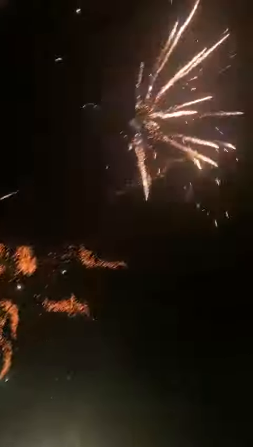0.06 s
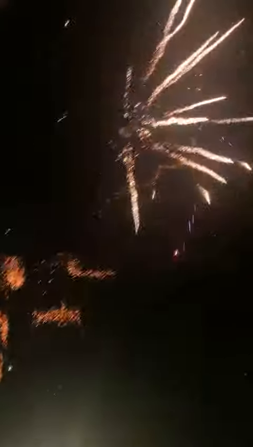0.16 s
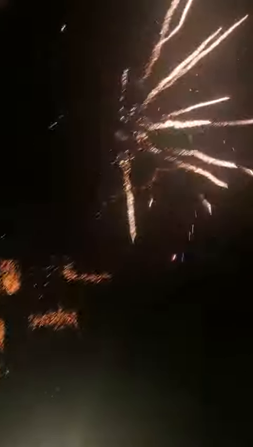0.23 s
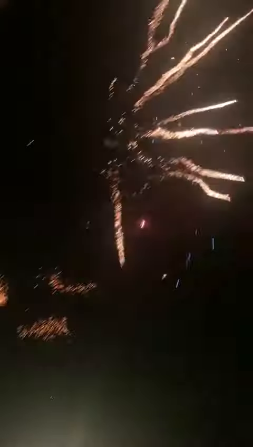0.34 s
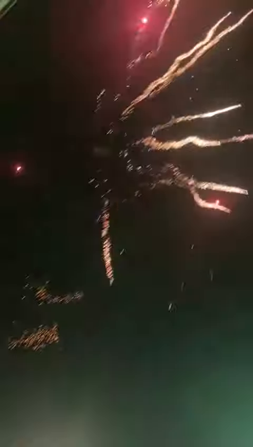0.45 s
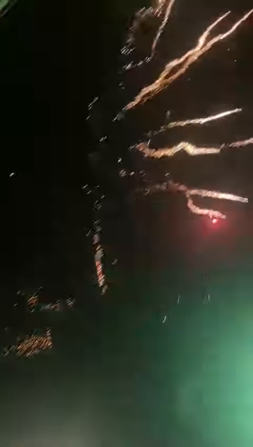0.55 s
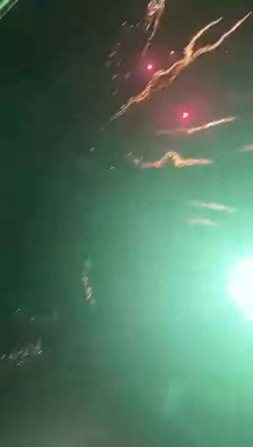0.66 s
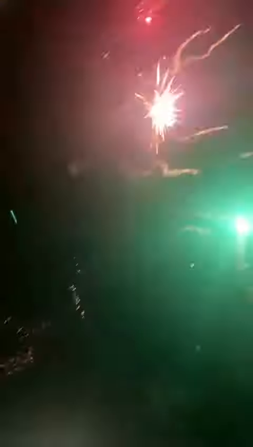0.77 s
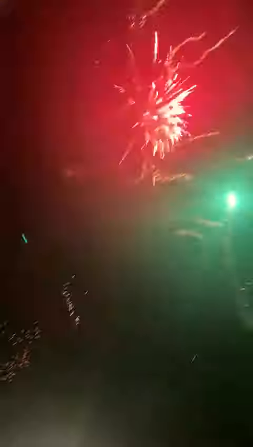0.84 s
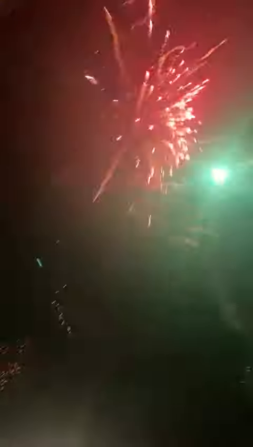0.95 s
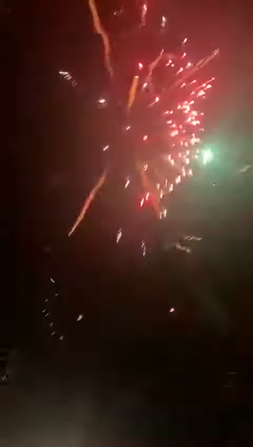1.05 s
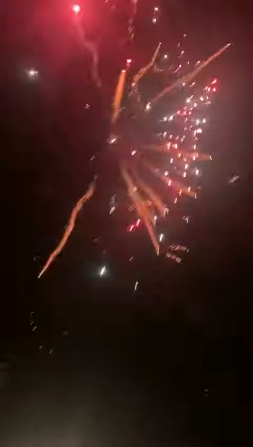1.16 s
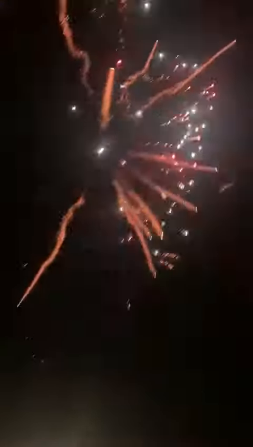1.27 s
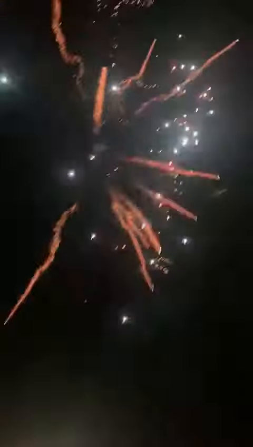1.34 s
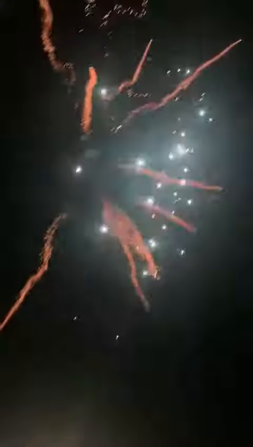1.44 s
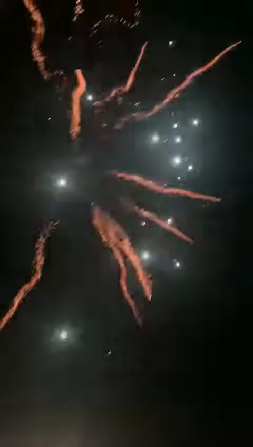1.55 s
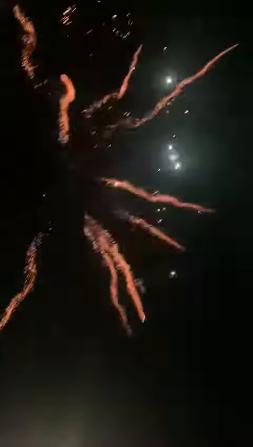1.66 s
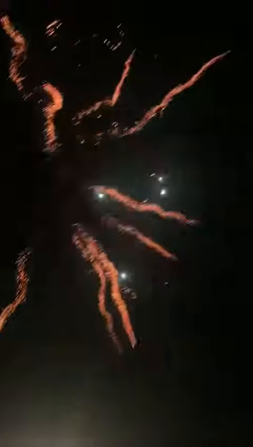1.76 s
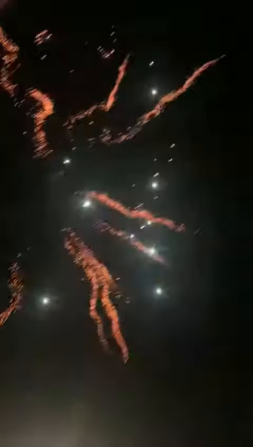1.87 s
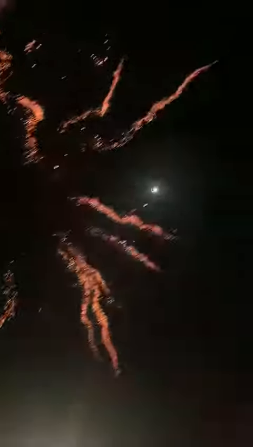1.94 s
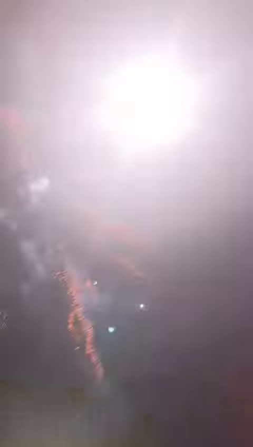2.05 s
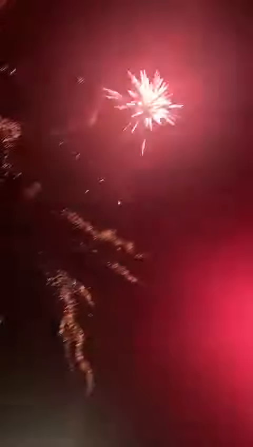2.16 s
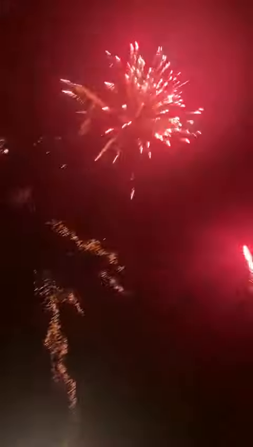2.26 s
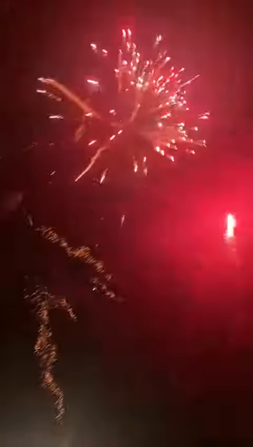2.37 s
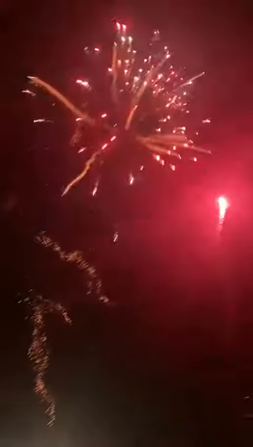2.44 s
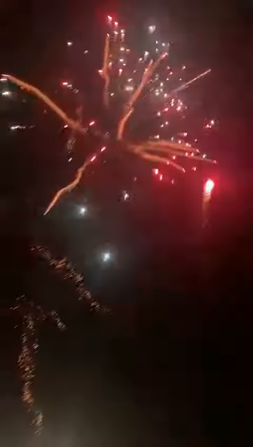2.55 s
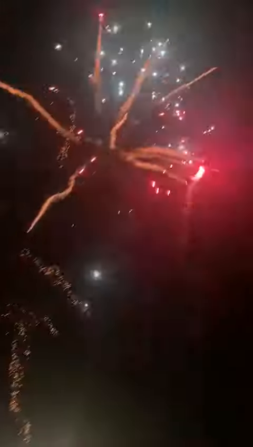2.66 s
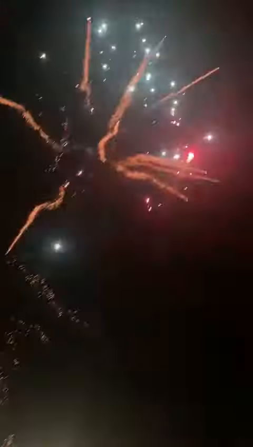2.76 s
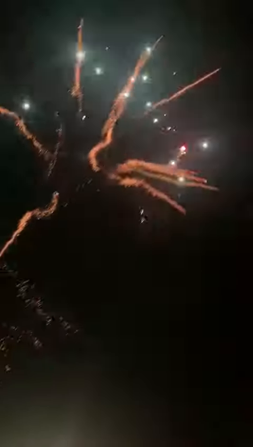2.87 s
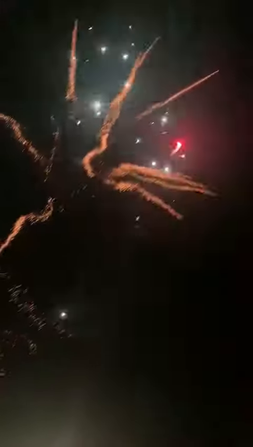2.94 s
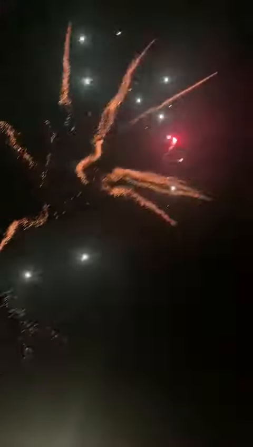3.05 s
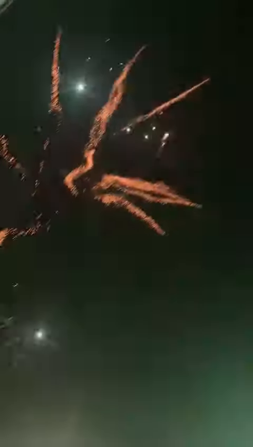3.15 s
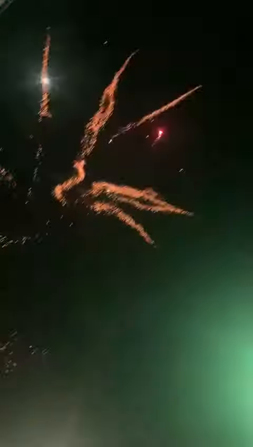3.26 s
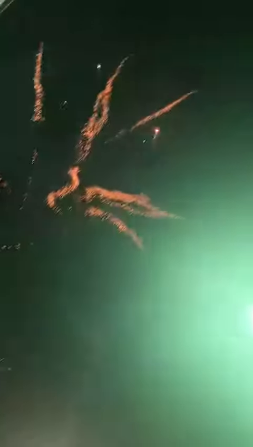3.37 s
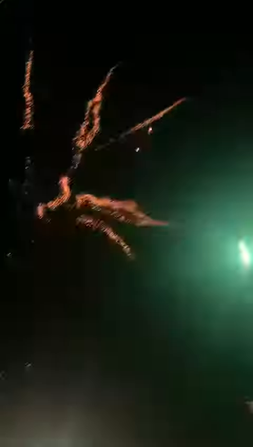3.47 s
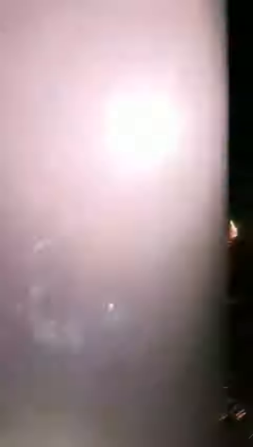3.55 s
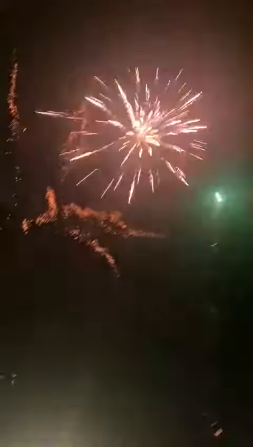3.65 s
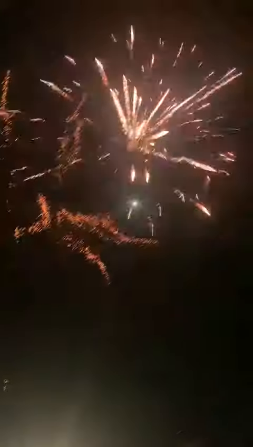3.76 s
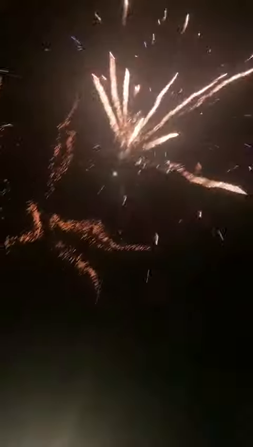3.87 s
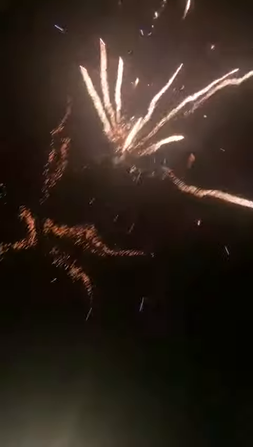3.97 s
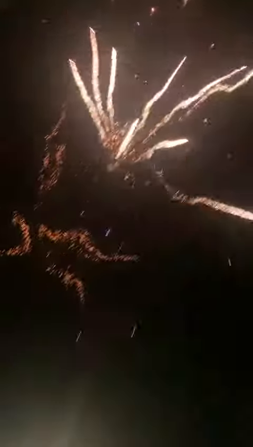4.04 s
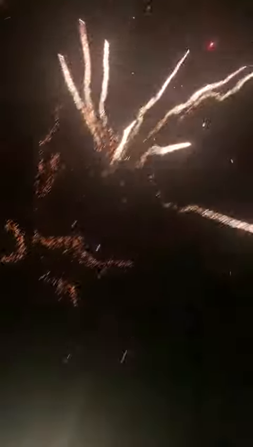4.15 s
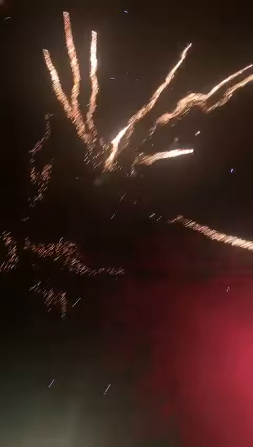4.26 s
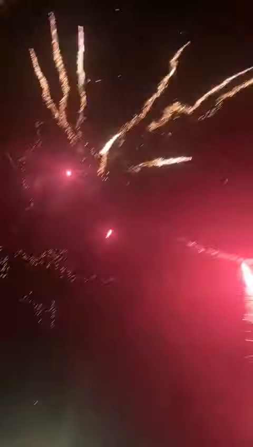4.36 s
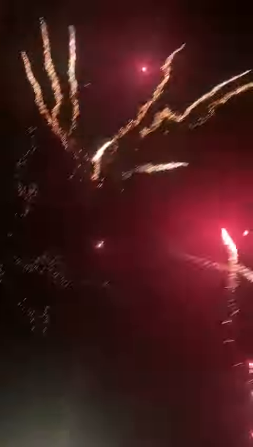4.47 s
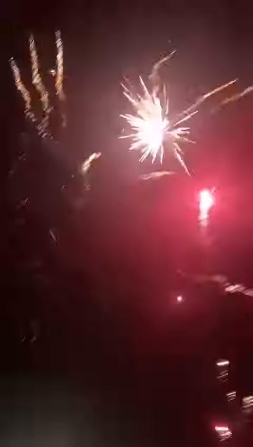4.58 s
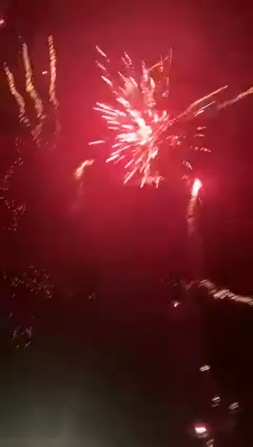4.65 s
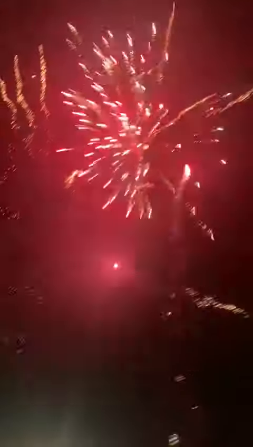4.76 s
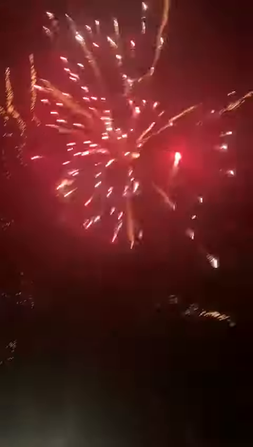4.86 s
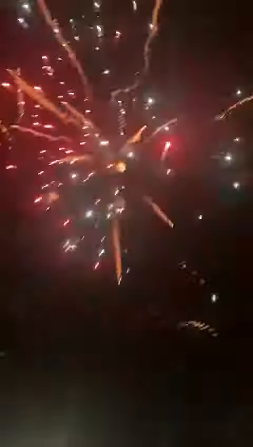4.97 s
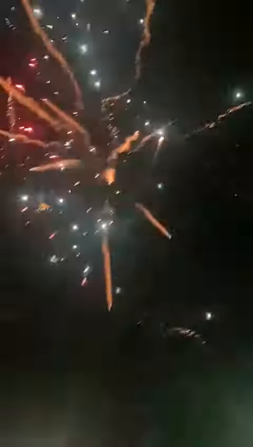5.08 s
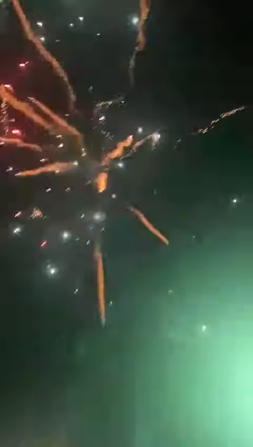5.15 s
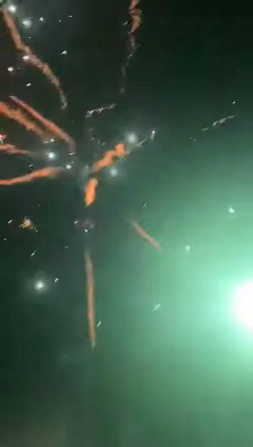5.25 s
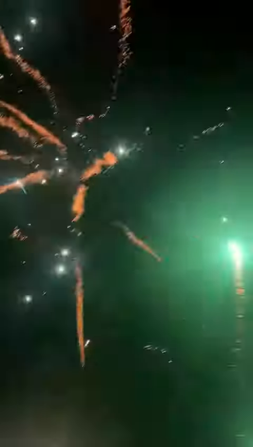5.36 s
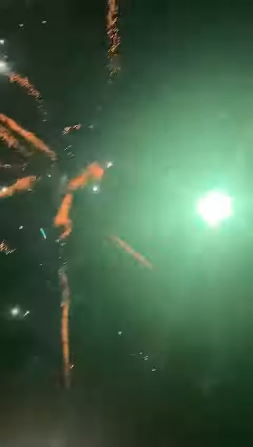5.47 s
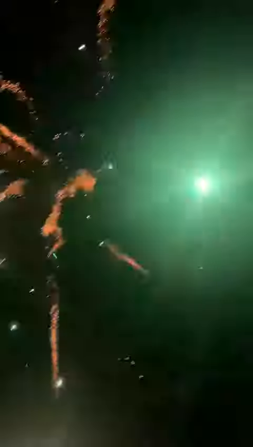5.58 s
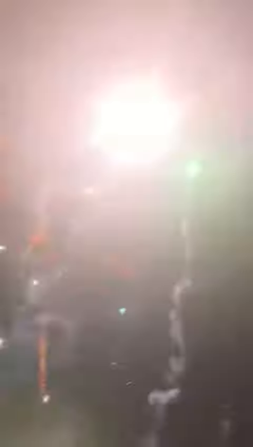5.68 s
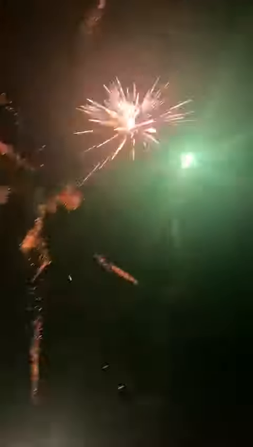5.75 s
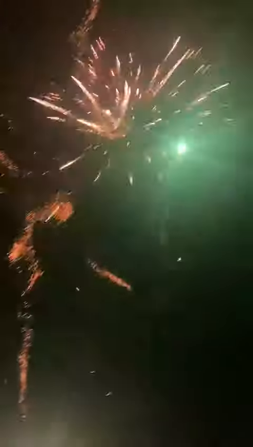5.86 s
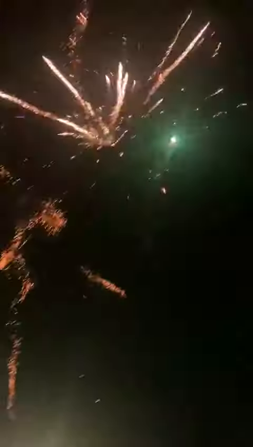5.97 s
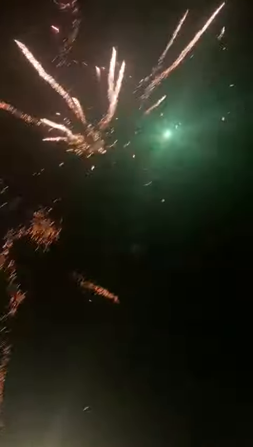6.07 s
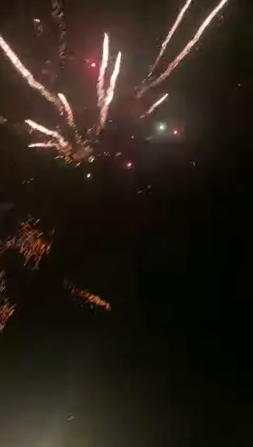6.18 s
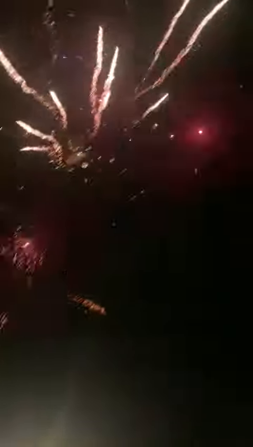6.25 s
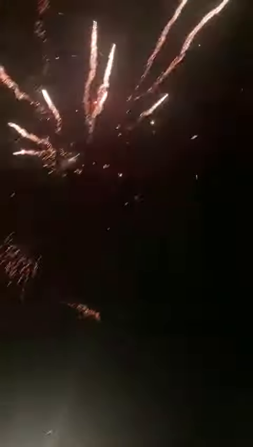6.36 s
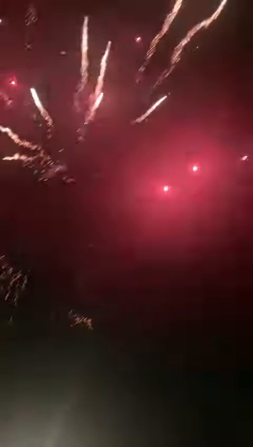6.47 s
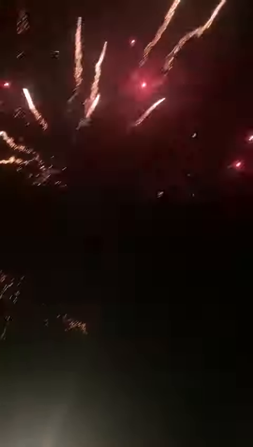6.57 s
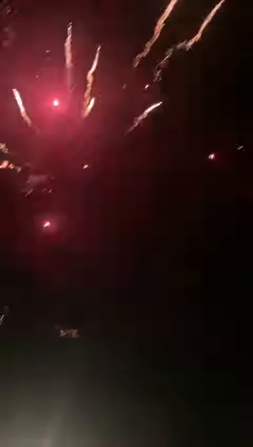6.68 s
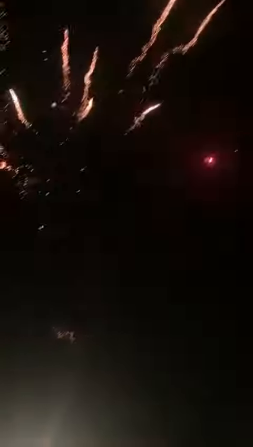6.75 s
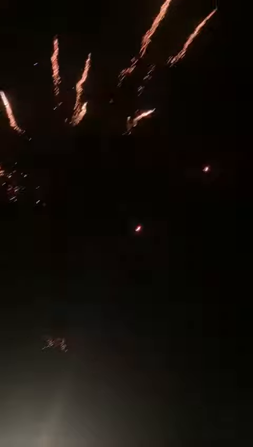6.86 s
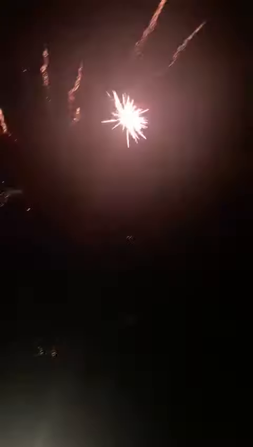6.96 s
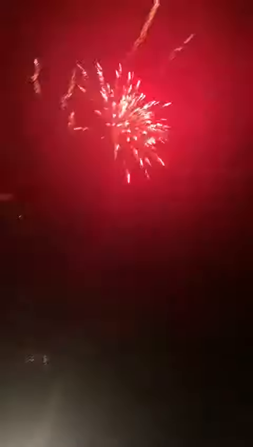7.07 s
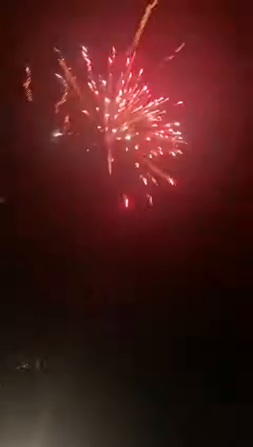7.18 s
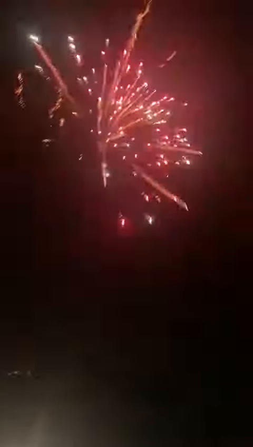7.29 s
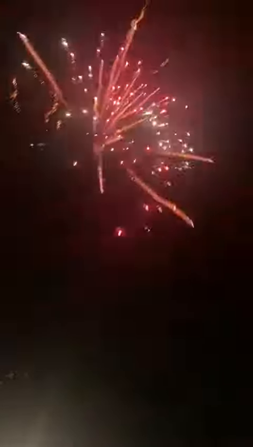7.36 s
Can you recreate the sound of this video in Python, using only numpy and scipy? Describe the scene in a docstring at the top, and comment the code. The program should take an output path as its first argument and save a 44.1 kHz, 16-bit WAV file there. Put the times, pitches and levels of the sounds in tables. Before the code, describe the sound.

Outdoors at night among houses, close to a firework battery. The rumble of an earlier burst is still fading at the start, with a tiny pop at 0.1 s. A heavy launch at 0.4 s booms low and hollow, and slaps back off a wall about an eighth of a second later. A shell bursts overhead at 0.9 s: sharp tearing crack, deep falling boom, rolling echo. More hollow, clacking launches follow at 1.9, 3.1, 4.1 and 5.0 s, answered by bursts at 2.2, 3.7, 4.7 and 5.8 s, the 3.7 one especially bassy. Dry pops and sizzling ticks cluster from 3.3 to 3.7 s, with a few more around 4.5 and 5.4 s. Echoes thin out before a last bright bang at 7.1 s, whose boom rolls away. Faint short whizzes trail the bursts; a distant town hum lies underneath. Loud peaks sound slightly squashed, the top treble dulled.

```python
"""Firework battery among houses

At night, heard from close by, mortar tubes launch shells with a hollow thump that slaps back off a wall.
The shells burst overhead with a crack and a falling boom that rolls round the neighbourhood.
Small pops, ticks and brief whizzes come in between. Booms and thumps are pulses whose lows lag;
cracks and scattered sound are short noises; echoes are delayed copies and fading noise."""
import sys
import numpy as np
from scipy import signal
from scipy.fft import rfft, irfft, next_fast_len
from scipy.io import wavfile

SR = 44100
rng = np.random.default_rng(int(sys.argv[2]) if len(sys.argv) > 2 else 0)


def master(y):
    """Save y as 16-bit WAV."""
    cut = np.clip(np.atleast_2d(y).T, -1, 1)
    pcm = np.round(cut * 32767)  # scale
    wavfile.write(sys.argv[1], SR, pcm.astype(np.int16))


N = 327205

# Event levels are in dB; for some sounds the function adds a trim.
# launches: (time [s], crack [dB], tube thump [dB], share of deep boom [0-1], wall slap [dB], wall clap [dB],
#            shock front [dB], ring of the mouth [Hz], its level [dB])
LAUNCHES = [(0.4266, -6, -13.5, 0.94, -8, -20, -16, 3300, -16.5),
            (1.9002, -10.5, -12, 0, -10, -22.5, -13.5, 4300, -10),
            (3.126, -10, -9.5, 0.04, -15.5, -22, -17, 3000, -17),
            (4.1043, -11, -10, 0, -13.5, -23, -13, 5000, -15.5),
            (5.007, -8.5, -11, 0, -9, -14, -16, 2200, -15)]
# shell bursts: (time [s], boom [dB], bass weight [dB], crack [dB], spacing of the shocks [s], brightness [dB],
#                ring of the casing [Hz], its level [dB], ground bounce [s], whizzing echo [dB],
#                its half-length [s])
BURSTS = [(0.8782, -9.5, -6, -12.5, 0.001, -2.5, 2290, -5, .0105, -39, .012),
          (2.228, -8, -17, -9.5, 0.00092, -1, 1150, -23, .0103, -33, 0.03),
          (3.7301, -12, 3, -8.5, .0011, -1.5, 2630, -10.5, .0099, -38.5, 0.014),
          (4.677, -13, -10, -7.5, 0.000885, -4.5, 1800, -6.5, .0115, -37, 0.0074),
          (5.8489, -9, -8, -8.5, 0.00094, -1.5, 2200, -12, .0105, -31.5, 0.0071),
          (7.1097, -9, -4.5, -19.5, 0.00105, 3, 2940, -8.5, .0097, -46, 0.025)]
# small pops and ticks: (time [s], snap [dB], body [dB], sizzle [dB])
POPS = [(0.122, -28, -32, -60), (0.791, -28, -34.5, -70), (1.365, -43, -33.5, -67),
        (3.3124, -30, -35, -42.5), (3.4035, -51, -55, -39), (3.492, -24, -32.5, -64),
        (3.5223, -22, -37, -29), (3.594, -22, -42.5, -25), (3.659, -33, -43, -52),
        (4.4694, -25.5, -36.5, -69), (4.641, -30, -31, -63), (5.3732, -30, -34, -60),
        (5.542, -44, -40, -78)]
# spectrum of a shell's boom: (frequency [Hz], level [dB per Hz])
BOOM_SPECTRUM = [(20, -25.5), (35, -5), (55, 2), (105, 0.5), (140, -2), (185, -0.5), (240, -3.5),
                 (290, -3.5), (400, -7.5), (600, -11.5), (800, -46), (2000, -53)]
# spectrum of a tube's thump: (frequency [Hz], level [dB per Hz])
THUMP_SPECTRUM = [(30, -36.5), (85, -8), (130, -16), (220, -18), (290, -1.5), (350, 1), (450, -4.5),
                  (560, -27.5), (1000, -32), (2000, -60.5)]
# spectrum of a heavy lift charge: (frequency [Hz], level [dB per Hz])
DEEP_BOOM_SPECTRUM = [(20, -25.5), (35, -7.5), (52, 2.5), (80, -3.5), (150, -16), (300, -5), (1000, -77)]
# noisy parts: (frequency [Hz], crack [dB per Hz], near scatter [dB per Hz], rolling echo [dB per Hz])
NOISE_SPECTRA = [(29.3, -25, -26.5, -21), (77, -15.5, 3, 2), (154.8, -2.5, 3, -2), (286, 4, 7, 0),
                 (536, 5.5, 1.5, 0), (865, -12, -13, -12), (1155, -1.5, -11.5, -8), (1930, -6, -13, -14),
                 (2840, -7.5, -18.5, -21.5), (4644, -11.5, -19, -21.5), (5460, -9.5, -25, -42),
                 (6500, -13.5, -26, -34.5), (7630, -27, -25.5, -29), (9800, -20.5, -26, -33.5),
                 (10700, -23.5, -28.5, -43.5), (12000, -27, -41.5, -66)]
# time the rolling echo takes to fall by 60 dB: (frequency [Hz], fall time [s])
ROLL_T60 = [(70, 3.38), (280, 2.04), (560, 2.24), (1100, 2.23), (2200, 2.1), (4500, 1.45), (9000, 0.75)]
# the two microphone ports, before a sound's spread is applied; in the treble the lead grows with pitch,
# like a short delay: (frequency [Hz], likeness [0-1], left lead [radians])
PORTS = [(90.2, .999, 0), (160, 1, -1), (264, 1, -0.2), (387, 0.86, -0.88), (547, 0.6, -2.5),
         (1205, 0.43, -2.5), (3000, 0.51, -2.5), (4110, 0, -5), (5100, 0.9, -3.5), (6370, 1, -2.5),
         (8900, 1, -0.2), (11100, .92, 2.5)]
# sound from near the ground favours the left port; each sound takes a share of this:
# (frequency [Hz], left minus right [dB])
GROUND_TILT = [(150, -0.5), (280, 12.5), (450, 17.5), (800, 3.5), (1500, 0.5)]
# distant hum of the town: (frequency [Hz], level [dB per Hz])
TOWN_SPECTRUM = [(20, -10), (60, -5), (150, -4), (320, -8), (900, -19.5), (1500, -24), (2600, -24.5),
                 (5000, -36.5), (6200, -43), (9000, -36), (12000, -52.5)]
# walls that clap back at every launch: (delay [s], level [dB])
CLAPPING_WALLS = [(0.1247, -3.5), (0.1383, -18), (.189, -13)]

TIME = np.arange(N) / SR
SIZE = next_fast_len(N)
HZ = np.maximum(np.arange(SIZE // 2 + 1) * SR / SIZE, 1)
SIDES = np.array([[1], [-1]])  # left, right
MICROPHONE_TOP_HZ, TOP_STOP_HZ = 11310, 13280
RAGGED_DB = 3.5  # random unevenness of a short blast's midrange
TOWN_DB = -58
STREET_DELAY_S, WALL_DELAY_S, GROUND_DELAY_S = 0.1693, 0.1257, 0.00285
# shared base levels: the noisy part of a burst's crack and the rolling echoes
BURST_CRACK_DB, BURST_ROLL_DB, BURST_ROLL_MIDS_DB, LAUNCH_ROLL_DB = -7.5, -33.5, -1, -36
# a burst just before the start, still rolling
EARLIER_BURST_S, EARLIER_ROLL_DB = -0.07, -32
# the whizz comes a fixed time after each burst, as off a ribbed roof or fence
WHIZZ_DELAY_S, WHIZZ_HZ = 0.1, 1790
# a heavy lift charge booms just after the crack
DEEP_LAG_S = 0.00029


def from_db(db):
    """Decibels to gain."""
    return 10 ** (np.asarray(db) / 20)


def at_hz(table, hz, axis=1):
    """One column of a table, read on a log-frequency axis."""
    table = np.array(table)
    return np.interp(np.log(hz), np.log(table[:, 0]), table[:, axis])


def rms_one(x):
    """Scale to an average strength (rms) of 1."""
    return x / np.sqrt(np.mean(x ** 2) + 1e-20)


def drift(rate):
    """Chance values, rate per second, joined by lines; after 4096 values the last one holds."""
    knots = rng.standard_normal(4096)
    return np.interp(TIME * rate, np.arange(len(knots)), knots)


def hump(centre_hz, steep_db):
    """A rounded spectrum, steep_db down an octave from its centre."""
    return lambda hz: -steep_db * np.log2(hz / centre_hz) ** 2


def crack_colour(hz):
    """Spectrum of the direct sound, dB per Hz."""
    return at_hz(NOISE_SPECTRA, hz)


def scatter_colour(hz):
    """Spectrum of the sound off nearby things, dB per Hz."""
    return at_hz(NOISE_SPECTRA, hz, axis=2)


def delayed(x, lag_s):
    """The same sound, lag_s later."""
    lag = max(round(lag_s * SR), 1)
    return np.pad(x, ((0, 0), (lag, 0)))[:, :N]


def doubled(x, lag_s, second_db):
    """A sound and its copy a moment later, which combs it into ringing bands."""
    return x + from_db(second_db) * delayed(x, lag_s)


def air_noise(colour_db, left=0., ragged_db=0., spread=0.86, ground_db=1.5, size=SIZE):
    """Noise at the two ports, less alike the wider its spread, combed by the ground reflection; rms 1."""
    hz = np.maximum(np.arange(size // 2 + 1) * SR / size, 1)
    shared, own = rfft(rng.standard_normal((2, size)))
    alike = np.clip(1 - spread * (1 - at_hz(PORTS, hz)), 0, 1)
    pair = np.sqrt(1 + alike) * shared + SIDES * np.sqrt(1 - alike) * own
    pair = pair * np.exp(.5j * SIDES * at_hz(PORTS, hz, axis=2))
    # a blast only a few ms long has humps and gaps of its own in the midrange
    humps = np.interp(hz, np.linspace(0, SR / 2, 160), rng.standard_normal(160))
    comb = np.cos(2 * np.pi * hz * GROUND_DELAY_S)
    midrange = hz / (hz + 300) / (1 + (hz / 5500) ** 4)
    ripple = (ragged_db * humps + ground_db * comb) * midrange
    tilt = SIDES * left * at_hz(GROUND_TILT, hz) / 2
    return rms_one(irfft(pair * from_db(colour_db(hz) + ripple + tilt), size))


def flash(s, level_db, t60, rise=0.00012, hold=0.):
    """Power envelope: a quick rise to time s, a plateau, then a fall of 60 dB per t60 seconds."""
    out = np.zeros(N)
    near = slice(max(int((s - 10 * rise) * SR), 0), int((s + hold + 2 * t60) * SR))
    age = TIME[near] - s
    growth = 2 * np.minimum(age, 0) / rise
    decay = np.log(1e6) * np.maximum(age - hold, 0) / t60
    out[near] = 10 ** (level_db / 10) * np.exp(growth - decay)
    return out


def blast(s, power, colour_db, left=0., size=16384):
    """A short noise of its own around time s, from one direction, under a power envelope."""
    out, start = np.zeros((2, N)), round((s - .04) * SR)
    noise = air_noise(colour_db, left, RAGGED_DB, spread=0.7, size=size)
    out[:, start:start + size] = noise[:, :N - start]
    return out * np.sqrt(power)


def pulse(s, colour_db, lag_s, slope, left=0.):
    """One pressure pulse whose lows lag (lag_s at 100 Hz), so that it falls in pitch; height 1."""
    hz = np.maximum(np.arange(8193) * SR / 16384, 1)
    delay = lag_s * (np.maximum(hz, 30) / 100) ** -slope
    # adding up the delay over frequency gives the phase
    phase = 2 * np.pi * np.cumsum(delay) * (hz[2] - hz[1])
    phase = phase - SIDES / 2 * at_hz(PORTS, hz, axis=2)
    tilt = np.array([[0], [-left]]) * at_hz(GROUND_TILT, hz)
    wave = irfft(from_db(colour_db(hz) + tilt) * np.exp(-1j * phase))
    lead = wave.shape[1] // 8  # room for what comes ahead of time s
    wave, start = np.roll(wave, lead, axis=1), round(s * SR) - lead
    out = np.zeros((2, N))
    out[:, start:start + wave.shape[1]] = wave[:, :N - start] / abs(wave).max()
    return out


def town_hum():
    """The distant town: steady noise, strongest in the lows."""
    return from_db(TOWN_DB) * air_noise(lambda hz: at_hz(TOWN_SPECTRUM, hz))[:, :N]


def single_walls(per_s=9.0, wall_db=-7.0, t60=0.083):
    """Gain of an echo in which single walls now and then stand out as short slaps."""
    hits = (rng.random(N) < per_s / SR) * rng.exponential(1, N) * from_db(wall_db) ** 2
    keep = from_db(-60 / (t60 * SR)) ** 2  # power left after one sample
    power = 1 + signal.lfilter([1], [1, -keep], hits + 1e-18)
    return np.sqrt(power / power.mean())


def rolling_echo(lumpy_db=1.0, grain_db=0.7, patchy_db=2.6, houses_db=3.5, early_db=0.0, street_db=6.0):
    """Countless reflections off houses, as noise in octave bands; the air takes the treble first."""
    noise = rfft(air_noise(lambda hz: at_hz(NOISE_SPECTRA, hz, axis=3), left=0.33, ground_db=2.5))
    lumps, out = lumpy_db * drift(55) + grain_db * drift(300), 0
    slaps = single_walls()
    octave, coarse = np.clip(np.log2(HZ / 70), 0, 7), TIME[::32]
    overhead = [(s, BURST_ROLL_DB) for s, *rest in BURSTS] + [(EARLIER_BURST_S, EARLIER_ROLL_DB)]
    for k in range(8):
        band_hz = 70 * 2 ** k
        t60, power = at_hz(ROLL_T60, band_hz), 0
        # db is the level 0.15 s after the report
        fade = lambda s, db: (coarse > s) * from_db(db - 60 * (coarse - s - .15) / t60) ** 2
        for s, *rest in LAUNCHES:
            power = power + fade(s, LAUNCH_ROLL_DB)
        for s, broad in overhead:
            roll = broad + BURST_ROLL_MIDS_DB * from_db(hump(900, 6)(band_hz))
            # a burst in the sky reaches many more walls: the echo builds up, and one row of houses stands out
            late = coarse - s - STREET_DELAY_S
            power = power + fade(s, roll + early_db)
            power = power + fade(s, roll + houses_db) * np.clip(1 + late / 0.06, 0, 1)
            power = power + fade(s, roll + street_db) * np.exp(-(late / 0.0062) ** 2)
        band = irfft(noise * np.maximum(1 - abs(octave - k), 0), SIZE)[:, :N]
        if k < 7:  # the slaps of single walls leave the top treble alone
            band = band * slaps
        level = np.interp(TIME, coarse, np.sqrt(power))
        out = out + band * level * from_db(lumps + patchy_db * drift(30))
    return out


def house_clatter(cracks, per_s=16, clatter_db=-19.5, first_s=0.09, t60=1.8, uneven_db=3.0, count=5):
    """Rows of houses throw the cracks back in uneven, fading clumps; each row's ledges colour its echoes."""
    out, age = 0, TIME[:2 * SR]
    for row in range(count):
        walls = rng.random(len(age)) < per_s / SR
        sizes = from_db(uneven_db * np.clip(rng.standard_normal(len(age)), -2, 2))
        sizes = sizes * rng.choice([-1, 1], len(age))
        taps = walls * sizes * (age > first_s) * from_db(-60 * age / t60)
        taps = taps / np.sqrt(np.sum(taps ** 2) + 1e-20)
        coloured = doubled(cracks, rng.uniform(0.00022, 0.0018), second_db=-2.0)
        out = out + signal.fftconvolve(coloured, taps[None], axes=1)[:, :N]
    return from_db(clatter_db) * out


def wall_claps(centre_hz=2200, ground_bounce_db=4.0, body_db=-13.0, body_t60=0.07,
               thump_echo_db=-13.0, thump_delay_s=0.148):
    """Flat walls return each launch as a hard clap and short rattle; a house front returns the thump."""
    out = 0
    for s, level, thump, deep, slap, clap, *rest in LAUNCHES:
        shock = from_db(clap) * pulse(s, hump(centre_hz, 4.9), lag_s=0.011, slope=0.74)
        shock = doubled(shock, GROUND_DELAY_S, ground_bounce_db)
        rattle = 0
        for delay, db in CLAPPING_WALLS:
            out = out + from_db(db) * delayed(shock, delay)
            rattle = rattle + flash(s + delay + 0.0037, clap + body_db + db, t60=body_t60, rise=0.0008)
        out = out + blast(s, rattle, hump(1030, 13.0))
        thump_echo = pulse(s + thump_delay_s, hump(320, 14), lag_s=0.017, slope=0.8, left=0.4)
        out = out + from_db(thump + thump_echo_db) * thump_echo
    return out


def wall_slaps(knock_db=-7.0, tick_db=-8.5, trail_db=-22.5):
    """A far wall returns each launch: a snapping tick, a duller knock and a short trail of echo noise."""
    out = 0
    for s, level, thump, deep, slap, *rest in LAUNCHES:
        back = s + WALL_DELAY_S
        tick = flash(back, level + slap + tick_db, t60=.014, rise=.0006, hold=.001)
        knock = flash(back, thump + slap / 2 + knock_db, t60=0.066, rise=0.0015, hold=0.0015)
        trail = flash(back + 0.0096, level + slap + trail_db, t60=0.4, rise=0.007, hold=.01)
        out = out + blast(s, tick, crack_colour) + blast(s, trail, hump(950, 2.1))
        out = out + doubled(blast(s, knock, hump(940, 15.0)), GROUND_DELAY_S, second_db=-14.0)
    return out


def yard_bark(bark_db=-11.5, bark_t60=0.12):
    """Low walls round the battery answer each launch with a short midrange bark."""
    out = 0
    for s, level, thump, *rest in LAUNCHES:
        first = flash(s + 0.0034, thump + bark_db + 7.5, t60=0.028, rise=0.0019)
        second = flash(s + 0.028, thump + bark_db, t60=bark_t60, rise=0.0035, hold=0.01)
        out = out + blast(s, first + second, hump(980, 18), left=0.58)
    return out


def whizzes(glide=1.8, rough_per_s=700, lead=1.34):
    """A brief whizz that sags in pitch after each burst; chance roughens all but the last two."""
    out = 0
    for s, *rest, whizz, length in BURSTS:
        age = TIME - s - WHIZZ_DELAY_S
        phase = 2 * np.pi * WHIZZ_HZ * (age - glide * age ** 2 / 2)
        near = abs(age) < 4 * length
        rasp = (drift(rough_per_s) + 1j * drift(rough_per_s))[near]
        rasp = rasp * np.exp(-(age[near] / length) ** 2)
        whizzing = np.zeros((2, N))
        whizzing[:, near] = np.real(rasp * np.exp(1j * (phase[near] - SIDES / 2 * lead)))
        out = out + from_db(whizz) * whizzing
    return out


def pops(snap_db=-15.0, tail_db=-17.5):
    """Each pop has a dry snap, a duller body and a thin sizzle, all short noises."""
    out = 0
    for s, db, body, sizzle in POPS:
        snap = flash(s + 0.00064, db + snap_db, t60=0.014, hold=0.0014)
        tail = flash(s + 0.00089, db + tail_db, t60=0.14)
        out = out + blast(s, snap + tail, hump(3330, 12.4))
        out = out + blast(s, flash(s + 0.0013, body, t60=0.1), hump(800, 4.6))
        out = out + blast(s, flash(s + 0.00094, sizzle, t60=0.016, hold=0.0013), hump(6700, 6.3))
    return out


def shock_fronts(burst_db=-4.0, shock_t60=0.0029, ground_bounce_db=-3.5, house_db=-16.0, house_delay_s=0.035):
    """Each report's needle-sharp front glances off the ground, or from overhead off the nearest house."""
    low, high = 0, 0

    def front(s, db):
        """A very short, bright noise."""
        return blast(s, flash(s, db, t60=shock_t60, rise=0.00057, hold=0.00037), hump(8200, 6.0))

    for s, level, thump, deep, slap, clap, front_db, *rest in LAUNCHES:
        low = low + front(s + 0.0017, front_db)
    for s, boom, bass, crack, lag, bright, *rest in BURSTS:
        high = high + front(s + 0.0021, BURST_CRACK_DB + burst_db + bright)
    return doubled(low, GROUND_DELAY_S, ground_bounce_db) + doubled(high, house_delay_s, house_db)


def muzzle_cracks(muzzle_db=1.5, ground_bounce_db=-2.5, centre_hz=940, lead_s=0.00251):
    """Each tube mouth's ringing shock arrives direct and off the ground: a hollow clack."""
    shocks = 0
    for s, level, *rest, ring_hz, ring in LAUNCHES:
        shock = pulse(s - lead_s, hump(centre_hz, 6.9), lag_s=.017, slope=.74, left=0.22)
        mouth_ring = pulse(s - 0.0006, hump(ring_hz, 30), lag_s=.017, slope=.74)
        shocks = shocks + from_db(level + muzzle_db) * shock + from_db(ring) * mouth_ring
    return doubled(shocks, GROUND_DELAY_S, ground_bounce_db)


def launches(thump_db=10.5, deep_db=-4.5, crack_db=-3.5, scatter_db=-14.0, yard_db=-17.5, lead_in_db=-10.5,
             bass_cut_db=17.0, crack_bass_cut_db=-4.5):
    """The lift charge cracks, the tube thumps; the ground and nearby things send it back."""
    thump_colour = lambda hz: at_hz(THUMP_SPECTRUM, hz)
    deep_colour = lambda hz: at_hz(DEEP_BOOM_SPECTRUM, hz)
    # the cut for the crack is negative, so its bass is lifted
    launch_crack = lambda hz: crack_colour(hz) - crack_bass_cut_db * np.exp(-hz / 500)
    launch_scatter = lambda hz: scatter_colour(hz) - bass_cut_db * np.exp(-hz / 500)
    out = 0
    for s, level, thump, deep, slap, *rest in LAUNCHES:
        tube = pulse(s + 0.0007, thump_colour, lag_s=0.01709, slope=0.736, left=0.75)
        charge = pulse(s + DEEP_LAG_S, deep_colour, lag_s=0.0167, slope=0.78)
        out = out + from_db(thump + thump_db) * tube + deep * from_db(deep_db) * charge
        crack = flash(s + 0.0012, level + crack_db, t60=0.028, hold=0.0004)
        bounce_s = s + 0.00037 + GROUND_DELAY_S
        crack = crack + flash(bounce_s, level + crack_db - 3.0, t60=0.091, hold=0.00033)
        # a faint noise rises some ms ahead of the crack
        lead_in = flash(s, level + lead_in_db, t60=.01, rise=.005)
        scatter = flash(s + 0.0094, level + scatter_db, t60=0.046, rise=0.00087, hold=0.013)
        yard = flash(s + 0.03, level + yard_db, t60=0.16, rise=0.0014, hold=0.016)
        out = out + blast(s, crack + lead_in, launch_crack, left=0.55)
        out = out + blast(s, scatter + yard, launch_scatter, left=0.39)
    return out


def shell_cracks(second_db=-3.0, third_db=-13.0, centre_hz=1250, ground_bounce_db=-9.0,
                 overtone_ratio=1.43, overtone_db=-7.0):
    """Each casing splits in a few quick shocks and rings at its own pitch; the ground throws it back up."""
    out = 0
    for s, boom, bass, crack, lag, bright, ring_hz, ring, bounce, *rest in BURSTS:
        shock = from_db(crack) * pulse(s - 0.0004, hump(centre_hz, 18.0), lag_s=0.017, slope=.72)
        shocks = doubled(doubled(shock, lag, second_db), lag, third_db)
        tone = pulse(s - 0.0002, hump(ring_hz, 90), lag_s=0.017, slope=.72)
        overtone = pulse(s - 0.0002, hump(ring_hz * overtone_ratio, 140), lag_s=0.017, slope=.72)
        casing = from_db(ring) * tone + from_db(ring + overtone_db) * overtone
        out = out + doubled(shocks + casing, bounce, ground_bounce_db)
    return out


def bursts(boom_db=6.5, crack_db=-8.0, scatter_db=-6.5, lead_in_db=-12.5, bass_share=0.93, rebound_db=-12.0,
           second_db=-2.5, ground_bounce_db=-6.0):
    """A shell tears open in a ragged crack; its boom rebounds off the ground and the nearest house."""
    out = 0
    for s, boom, bass, shock, lag, bright, ring_hz, ring, bounce, *rest in BURSTS:
        boom_colour = lambda hz: at_hz(BOOM_SPECTRUM, hz) + bass_share * (bass + 4) / (1 + (hz / 130) ** 2)
        treble = lambda hz: bright * hz / (hz + 1200)
        direct = pulse(s, boom_colour, lag_s=.018, slope=0.73, left=0.043)
        off_ground = pulse(s + bounce, hump(295, 17), lag_s=.018, slope=0.725)
        off_house = pulse(s + 0.03, hump(298.4, 22), lag_s=0.031, slope=0.786, left=0.43)
        booms = direct + from_db(ground_bounce_db) * off_ground + from_db(rebound_db) * off_house
        out = out + from_db(boom + boom_db) * booms
        crack = flash(s + 0.00101, BURST_CRACK_DB + crack_db, t60=0.011, hold=0.0032)
        crack = crack + flash(s + 0.0112, BURST_CRACK_DB - 8.0, t60=0.012, rise=0.0011)
        # a faint noise rises some ms ahead of the crack
        lead_in = flash(s - .007, BURST_CRACK_DB + lead_in_db - 4, t60=.012, rise=.002, hold=.007)
        scatter = flash(s + 0.0085, BURST_CRACK_DB + scatter_db, t60=0.15, rise=0.0027, hold=0.014)
        torn = blast(s, crack + lead_in, lambda hz: crack_colour(hz) + treble(hz))
        out = out + doubled(torn, lag, second_db)
        out = out + blast(s, scatter, lambda hz: scatter_colour(hz) + treble(hz), left=0.35)
    return out


def scene():
    """The quiet night, the echoes, the small sounds and the reports."""
    muzzles, shells = muzzle_cracks(), shell_cracks()
    echoes = rolling_echo() + house_clatter(shells + from_db(-7.0) * muzzles)
    echoes = echoes + wall_claps() + wall_slaps() + yard_bark()
    reports = shock_fronts() + muzzles + launches() + shells + bursts()
    return town_hum() + echoes + whizzes() + pops() + reports


def record(dry):
    """The microphone rolls off the top treble, the loudest peaks are squashed, the top is cut."""
    roll_off = signal.butter(6, MICROPHONE_TOP_HZ, fs=SR, output="sos")
    top_cut = signal.cheby2(10, 35, TOP_STOP_HZ, fs=SR, output="sos")
    heard = signal.sosfiltfilt(roll_off, dry)
    squashed = heard / (1 + (heard / .86) ** 8) ** (1 / 8)  # stays within 0.86
    return signal.sosfiltfilt(top_cut, squashed)


dry = scene()
out = record(dry)
master(out)
```